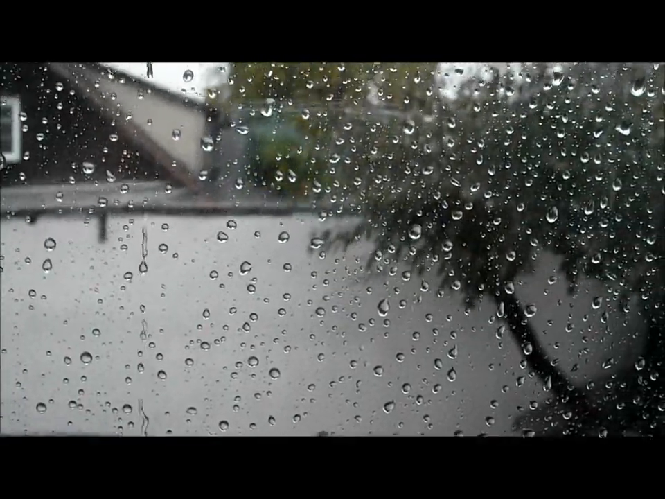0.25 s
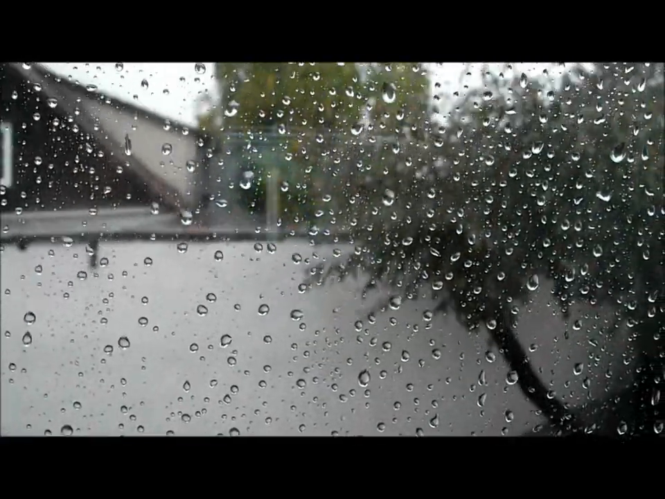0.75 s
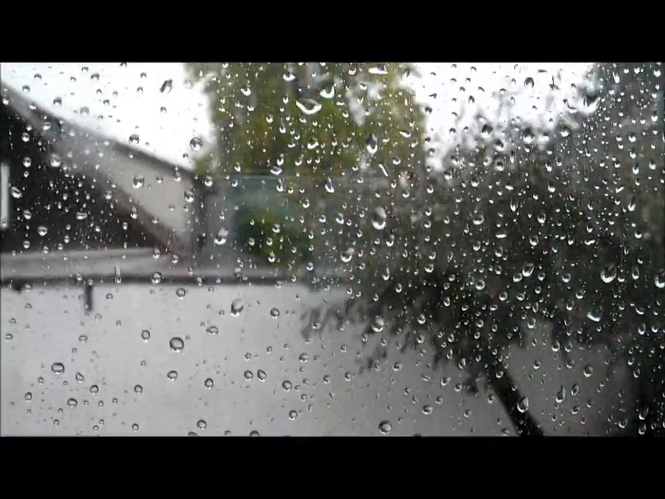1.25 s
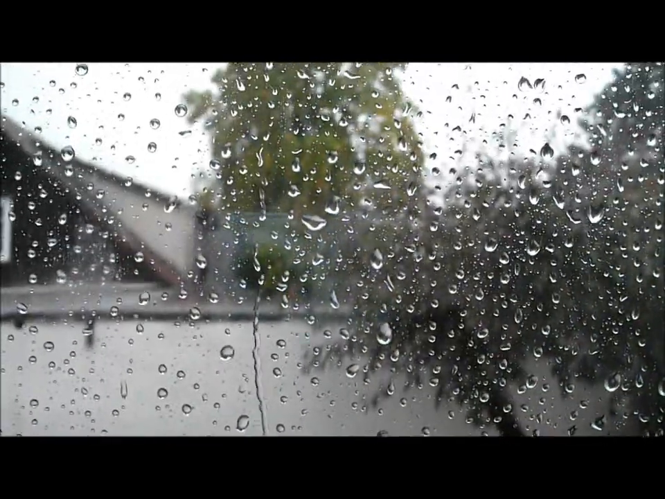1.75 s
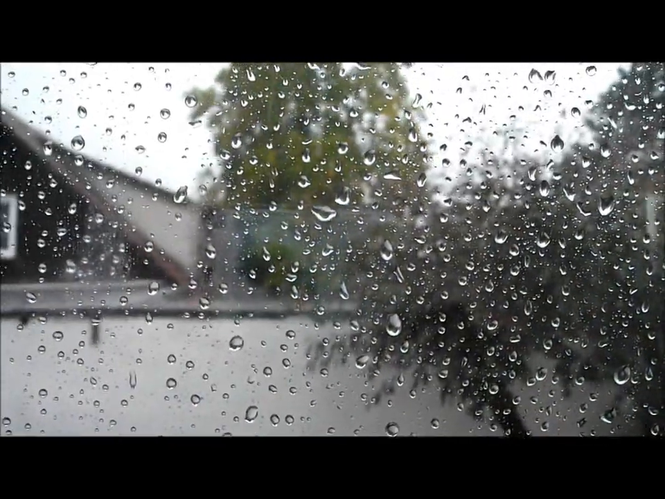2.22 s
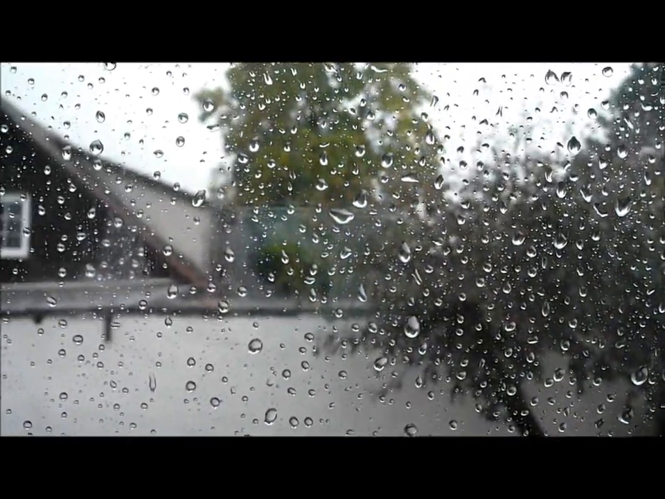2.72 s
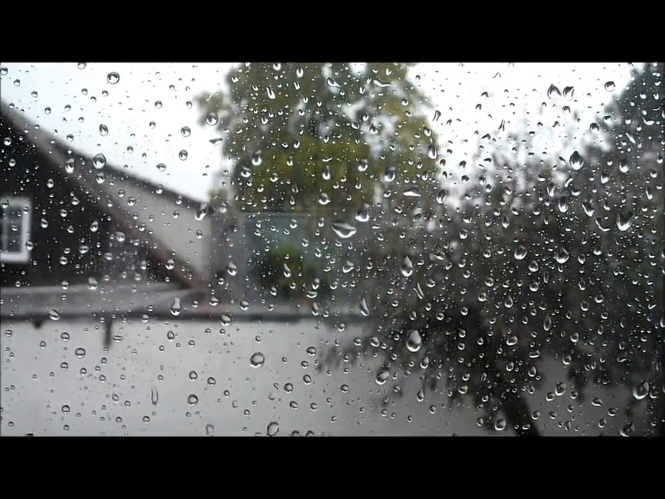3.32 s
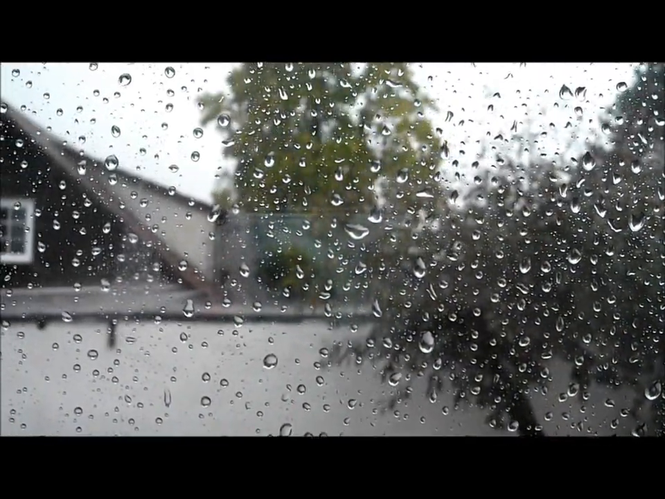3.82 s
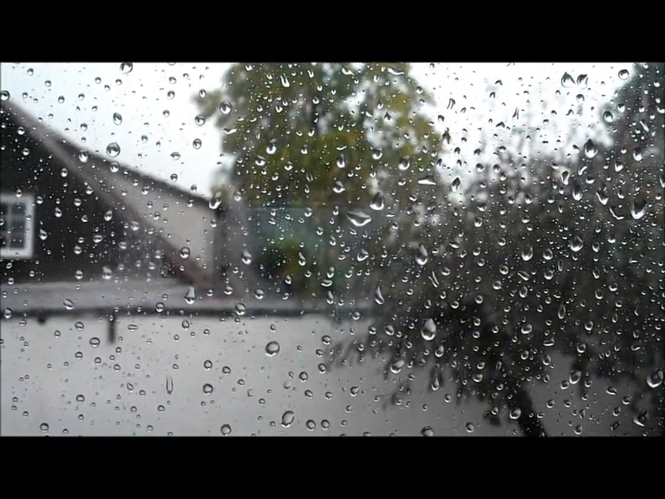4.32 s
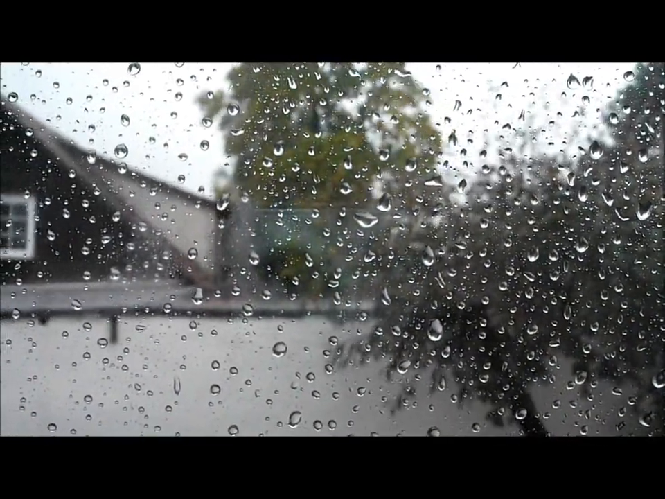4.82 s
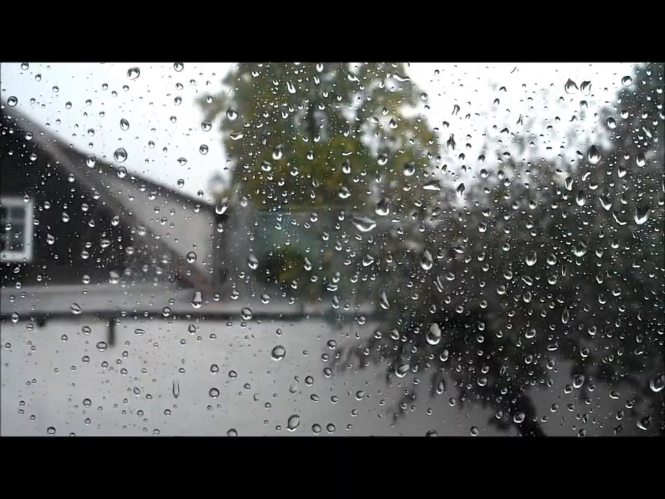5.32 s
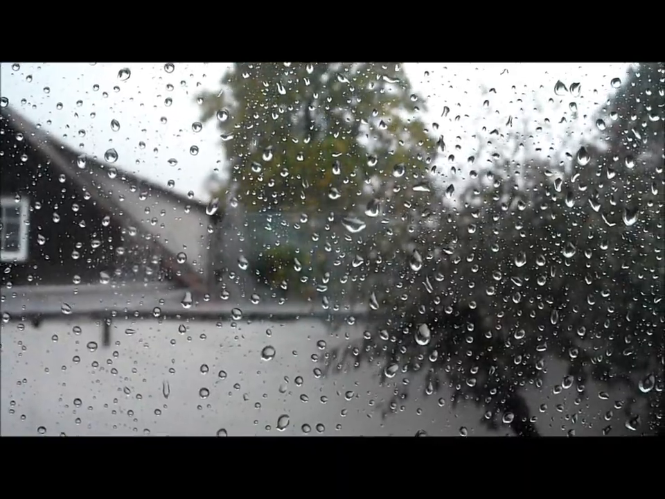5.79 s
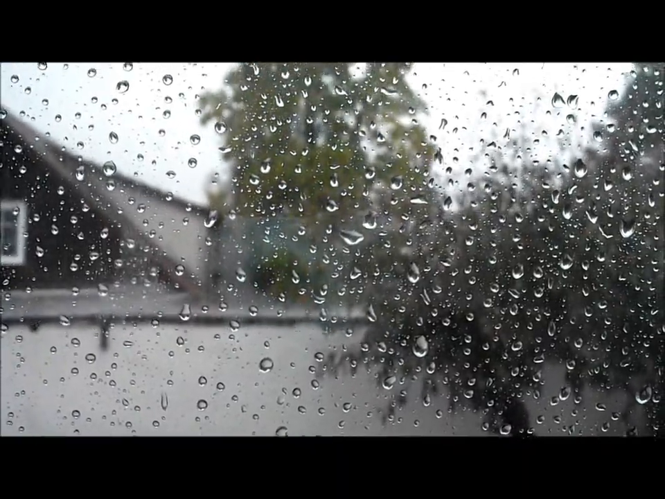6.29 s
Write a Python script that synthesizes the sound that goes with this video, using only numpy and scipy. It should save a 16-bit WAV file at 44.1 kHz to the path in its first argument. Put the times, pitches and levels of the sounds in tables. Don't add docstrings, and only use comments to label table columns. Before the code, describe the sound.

A small camera's microphone, held near wet glass in a quiet room, picks up rain drumming outside. Single drops thump dully, some deeper, some higher near the frame, mixed with short bright spatters. The patter thickens after two seconds, thins slightly near five, then picks up at the end. Low electrical hum and a constant thin, fluttering motor hiss and whine continue throughout.

```python
import sys
import numpy as np
from scipy import signal
from scipy.fft import rfft, irfft, next_fast_len
from scipy.io import wavfile

SR = 44100
rng = np.random.default_rng(int(sys.argv[2]) if len(sys.argv) > 2 else 0)


def natural_amplitude(level_db):
    exponent = np.asarray(level_db, float) / 20
    return 10 ** exponent


def generate_wav(signal):
    frames = np.transpose(np.atleast_2d(signal))
    scaled = np.clip(frames, -1, 1) * 32767
    pcm = np.round(scaled).astype(np.int16)
    wavfile.write(sys.argv[1], SR, pcm)


N = 288863
TIME = np.arange(N) / SR
MIDDLE_HZ = 551.3


def unit(x):
    return x / np.sqrt(np.mean(x ** 2) + 1e-20)


def along(points, hz):
    point_hz, value = np.transpose(points)
    return np.interp(np.log(hz + 1), np.log(point_hz + 1), value, left=-120, right=-120)


def filtered(x, response):
    m = next_fast_len(N + 8192)
    return unit(irfft(rfft(x, m) * response(np.fft.rfftfreq(m, 1 / SR)), m)[:N])


def coloured_noise(spectrum):
    return filtered(rng.standard_normal(N), lambda hz: natural_amplitude(along(spectrum, hz)))


def slow_waver(corner_hz):
    return filtered(rng.standard_normal(N), lambda hz: 1 / (1 + (hz / corner_hz) ** 2))


def resonance(centre_hz, width_hz):
    return filtered(rng.standard_normal(N), lambda hz: 1 / (1 + ((hz - centre_hz) / width_hz * 2) ** 2))


def ringing(modes):
    return sum(natural_amplitude(db) * resonance(hz, width) for hz, width, db in modes)


def place(bursts, seconds):
    at = np.round(seconds * SR).astype(int)[:, None] + np.arange(bursts.shape[1])
    return np.bincount(np.clip(at, 0, N).ravel(), bursts.ravel(), N + 1)[:N]


def room():
    # hz, level_db_per_hz
    rumble_spectrum = [(12, -53), (26, -6.5), (49, -0.5), (91, -6), (150, 1), (165, -13), (210, -2),
                       (360, -120)]
    rumble = natural_amplitude(-51.0) * coloured_noise(rumble_spectrum)
    hum_db = -48.6 + 0.9 * slow_waver(3)
    hum = natural_amplitude(hum_db) * np.sqrt(2) * np.sin(2 * np.pi * 180.11 * TIME)
    modes = ringing([(180, 44, -57.5), (226.0, 16, -64.0), (281, 11, -66.0), (565.6, 21, -66)])
    return hum + rumble + modes


def squeal():
    harmonics_db = [-72, -67.5, -56.5]
    pitch_hz = 3891 + 17 * slow_waver(40)
    phase = 2 * np.pi * np.cumsum(pitch_hz) / SR
    return sum(natural_amplitude(db) * np.sin((k + 1) * phase) for k, db in enumerate(harmonics_db))


def motor():
    turns_hz, depth = 29.007, 1.48
    # share_of_turn, shell_db, top_db, hiss_db
    rotor_turn = [(0, -2, 0, 0), (.24, -2, 1, .5), (.31, -1, 3, 3), (.38, .5, -1, 0), (.5, 3.5, 1.5, 0),
                  (.63, 3.5, 1.5, 0), (.7, -2, -4, -.3), (.97, -2.5, -4, -.5), (1, -2, 0, 0)]
    shell_hz = [11300, 11665, 11950, 12120, 12690]
    # width_hz, level_db
    shell_modes = [(790, -63), (250, -59.5), (590, -59), (149, -74), (120, -89)]
    shell_top_hz = [15230, 15600]
    # width_hz, level_db
    shell_top_modes = [(55, -78), (200, -88)]
    # hz, level_db_per_hz
    hiss_spectrum = [(5000, -21.5), (7000, -16.5), (9000, -16), (10500, -8), (11300, -2), (12100, -14),
                     (12600, -7.5), (14000, -18.5), (15900, -13.5)]
    share, *columns_db = np.transpose(rotor_turn)
    position = TIME * turns_hz % 1
    shell_gain, top_gain, hiss_gain = (natural_amplitude(depth * np.interp(position, share, db)) for db in columns_db)
    shell = shell_gain * (squeal() + ringing(np.c_[shell_hz, shell_modes]))
    top = top_gain * ringing(np.c_[shell_top_hz, shell_top_modes])
    hiss = natural_amplitude(-53.0) * hiss_gain * coloured_noise(hiss_spectrum)
    flutter = 1 + .04 * np.cos(2 * np.pi * 12 * turns_hz * TIME)
    return flutter * (shell + top + hiss)


def whine():
    carrier_hz, step_hz = 9560.23, 36.22
    side_db = -76.5
    swing = natural_amplitude(-60) * (np.cos(2 * np.pi * step_hz * TIME) - .23)
    tone = np.sqrt(2) * swing * np.sin(2 * np.pi * carrier_hz * TIME)
    sides = [(-k, side_db - 1.1 * (k - 3)) for k in range(3, 12, 2)]
    sides += [(k, side_db - .5 * (k - 3)) for k in range(3, 16, 2)]
    for k, db in sides:
        tone += natural_amplitude(db + 3) * np.sin(2 * np.pi * ((carrier_hz + k * step_hz) * TIME + rng.random()))
    return tone


def patter(spectrum, count, spread_db, life_s, share):
    when, size = rng.random((count, 2)).T
    hits = np.bincount((when * N).astype(int), natural_amplitude(-spread_db * np.log(1 - size)), N)
    swell = signal.fftconvolve(hits, np.exp(-TIME[:2000] / life_s))[:N]
    grain = np.sqrt(share) * unit(swell) + np.sqrt(1 - share)
    return filtered(grain * rng.standard_normal(N), lambda hz: natural_amplitude(along(spectrum, hz)))


def pane_wash(rain_db):
    # hz, level_db_per_hz
    pane_spectrum = [(130, -52), (220, -7), (231, 0), (318, -3), (563, -1), (651, -5), (746, -5),
                     (949, -6.5), (1160, -15.5), (1500, -17.5), (1950, -75), (3300, -120)]
    return natural_amplitude(rain_db + 2) * patter(pane_spectrum, count=500, spread_db=0.7, life_s=0.0095, share=0.25)


def spray(rain_db):
    # hz, level_db_per_hz
    spray_spectrum = [(650, -2), (1100, -2.5), (1820, -5.5), (2270, -5.5), (3000, -0.5), (3500, -4.5),
                      (3980, -6), (4820, -9), (7150, -15), (7500, -12.5), (9750, -9.5), (16500, -120)]
    # hz, level_db_per_hz
    glazing_spectrum = [(2800, -30), (2950, -10), (3035, 5), (3120, -6), (3300, -35)]
    spray_db = -57.5 + 1.01 * (rain_db - rain_db.mean())
    fine = patter(spray_spectrum, count=900, spread_db=1.0, life_s=0.0058, share=0.078)
    through = patter(glazing_spectrum, count=120, spread_db=2.5, life_s=0.018, share=0.65)
    return natural_amplitude(spray_db + 1.5) * fine + natural_amplitude(spray_db - 14.5) * through


def splashes():
    # start_s, peak_db, middle_db, high_db
    sill = [(1.935, -37.5, -3, -12), (2.112, -38.5, -15, -25), (2.209, -29, -7, -24),
            (2.273, -35, -20, -20), (2.396, -30.5, -17, -26), (2.605, -26.5, -9, -16),
            (2.778, -40, -18, -15), (2.939, -36, -10, -13), (2.969, -33, -14, -13), (3.074, -34, -10, -15),
            (3.137, -38, -13, -10), (3.174, -28.5, -15, -21), (3.234, -30.5, -7, -13),
            (3.429, -38, -15, -15), (3.715, -32.5, -31, -22), (3.831, -29, -8, -16), (3.973, -33, -8, -22),
            (4.121, -30.5, -16, -19), (4.285, -36, -6, -18), (4.559, -35.5, -11, -20),
            (4.676, -35, -5, -22), (4.85, -40, -9, -19), (4.89, -34, -15, -18), (5.619, -39, -6, -20),
            (5.725, -32, -9, -22), (5.766, -32.5, -6, -19), (5.98, -34.5, -20, -22),
            (6.119, -29.5, -13, -25), (6.39, -32, -8, -24), (3.531, -38, -21, -22)]
    # start_s, peak_db, middle_db, high_db
    bright = [(.973, -40, -2, -14), (2.384, -36, -3, -14), (2.45, -34.5, 1, -15), (2.508, -34, -14, -19),
              (3.261, -35.5, 1, -26), (3.484, -34, -3, -22), (3.51, -34.5, -10, -6), (3.775, -28, -14, -12),
              (4.011, -40, -14, -10), (4.21, -40, -2, -14), (4.225, -32.5, -10, -18),
              (4.308, -35.5, -18, -10), (4.418, -34, 11, -20), (5.382, -33.5, 0, -21),
              (5.453, -38, -2, -16), (5.519, -38, -2, -18), (5.637, -30, 7, -12), (5.915, -36.5, -9, -14),
              (6.39, -32, 1, -16), (6.502, -34, -10, -10), (2.607, -32, -3, -12), (2.202, -38, 0, -20),
              (5.087, -37, -2, -20), (3.43, -41, -12, -13), (4.14, -40, -8, -8), (2.7, -39, -5, -10),
              (1.2, -42, -3, -15)]
    splash_hz = [700, 1450, 2100, 2900, 4400, 8500]
    start_s, peak_db, middle_db, high_db = np.transpose(list(sill) + list(bright))
    low_db = np.repeat([-6.5, -15.5], [len(sill), len(bright)])
    low_db = low_db + 3 * rng.standard_normal(len(start_s))
    t = TIME[:2048]
    tail = natural_amplitude(-60 * t / 0.063)
    burst = natural_amplitude(-6 - 60 * t / 0.019)
    envelope = (tail + burst) * (1 - np.exp(-t / 0.00013))
    puff = rng.standard_normal((len(start_s), len(t))) * envelope
    hz = np.fft.rfftfreq(len(t), 1 / SR)
    colour_db = []
    for low, mid, high in zip(low_db, middle_db, high_db):
        levels_db = [low - 14, low, (low + mid) / 2 - 10, mid - 1, high - 3, high - 22]
        colour_db.append(along(np.c_[splash_hz, levels_db], hz))
    puff = irfft(rfft(puff) * natural_amplitude(colour_db))
    puff /= np.sqrt(np.mean(puff[:, :130] ** 2, axis=1, keepdims=True))
    return place(natural_amplitude(peak_db - 13.5)[:, None] * puff, start_s)


def snaps():
    # start_s, peak_db
    hard_drops = [
        (3.7757, -33),
        (5.0946, -25.5),
    ]
    # pitch_hz, level_db, life_s
    glass_modes = [(2850, -8, .0008), (3600, -7, .00025), (4500, -2.5, .00022), (7400, -12, .0003)]
    start_s, peak_db = np.transpose(hard_drops)
    t = TIME[:256]
    click = 0
    for hz, db, life in glass_modes:
        click = click + natural_amplitude(db) * t / life * np.exp(1 - t / life) * np.sin(2 * np.pi * hz * t)
    return place(natural_amplitude(peak_db - 1.5)[:, None] * click, start_s + 0.00079)


def drops():
    # start_s, peak_db, push_ms, upper_db
    middle = [(.615, -33, 3.1, -16), (.839, -34, 4.4, -16), (.989, -32.5, 4.4, -16), (1.064, -36, 5.6, -12),
              (1.185, -34, 5.1, -9), (1.311, -36.5, 4.8, -29), (1.373, -35, 2.4, -10),
              (1.446, -33.5, 3.3, -26), (1.796, -37, 3.5, -3.5), (1.933, -35, 3.1, -12),
              (2.165, -37, 4.2, -9), (2.208, -31, 4.3, -9), (2.3, -35.5, 2.1, -10), (2.55, -34.5, 3.2, -8),
              (2.975, -37, 6.4, -20), (3.034, -34.5, 4.5, -11), (3.203, -34.5, 4.7, -15),
              (3.276, -36.5, 2.6, -8), (3.49, -31.5, 3, -11), (3.925, -32.5, 3.2, -9),
              (3.969, -35.5, 3.5, -8), (4.149, -32.5, 2.9, -12), (4.403, -35.5, 4.7, -14),
              (4.432, -33.5, 5.7, -8), (4.776, -34, 1.4, -11), (5.024, -34.5, 4.3, -8.5),
              (5.342, -36, 2.8, -17), (5.408, -38, 3.5, -18), (6.021, -37, 3.3, -15),
              (6.164, -33.5, 2.4, -17)]
    # start_s, peak_db, ring_hz, upper_db
    lower = [(.126, -37.5, 460, -9), (.218, -38, 448, -9), (.422, -38.5, 525, -24), (.467, -38, 510, -22),
             (.969, -40.5, 470, -4), (2.067, -39, 526, -5), (2.104, -36, 493, -21), (2.273, -37, 497, -8),
             (2.483, -34, 521, -14), (3.368, -36.5, 496, -10), (3.464, -32, 495, -25),
             (3.532, -28, 497, -9), (3.616, -40, 410, -5), (3.715, -31.5, 455, -17), (3.832, -40, 477, -7),
             (4.864, -35, 503, -16), (4.888, -40, 475, -6), (5.085, -36, 460, -9), (5.314, -39, 460, -5),
             (5.516, -36, 527, -13), (6.316, -36, 441, -5.5), (6.436, -38, 382, -17), (6.492, -36, 502, -3)]
    # start_s, peak_db, ring_hz
    edge = [(2.463, -32.5, 860), (2.598, -35, 836), (3.164, -35.5, 805), (3.236, -31.5, 904),
            (3.429, -37.5, 815), (3.752, -34.5, 820), (3.777, -36.5, 930), (4.226, -39, 984),
            (4.555, -37, 1035), (5.725, -39, 984), (5.764, -33.5, 850), (6.313, -41, 914),
            (6.511, -37, 910), (5.893, -40, 925), (4.07, -43, 900)]
    # start_s, peak_db
    light = [(.024, -42), (.508, -43.5), (1.271, -39.5), (2.505, -43), (2.838, -38.5), (3.074, -36),
             (3.606, -51), (3.668, -44), (4.206, -36), (4.63, -43.5), (5.192, -39), (5.689, -38),
             (5.748, -43.5), (5.873, -42), (6.212, -39), (6.268, -39.5), (1.077, -38.5), (1.203, -36),
             (1.392, -37), (3.293, -40), (.89, -43)]
    rows = [(s, db, MIDDLE_HZ, push_ms, upper) for s, db, push_ms, upper in middle]
    rows += [(s, db, hz, 2.7, upper) for s, db, hz, upper in lower]
    rows += [(s, db, hz, 2.9, -12) for s, db, hz in edge]
    rows += [(s, db, MIDDLE_HZ, 3.5, -11) for s, db in light]
    start_s, peak_db, ring_hz, push_ms, upper_db = np.transpose(rows)
    ring_hz = ring_hz + 7.1 * rng.standard_normal(len(rows))
    neighbour_db = -13 + 2 * rng.standard_normal(len(rows))
    return np.array([start_s, peak_db, ring_hz, push_ms / 1000, upper_db, neighbour_db])


def thuds():
    pane_pair_hz = 485, 565
    start_s, peak_db, hz, push_s, upper_db, neighbour_db = drops()[:, :, None]
    t = TIME[:2048]
    u = t / np.clip(push_s, .001, .015)
    blow = (u * np.exp(1 - u)) ** 2.76
    after = natural_amplitude(-15) * np.exp(-t * (hz / pane_pair_hz[1]) ** 2 / 0.039) * (1 - np.exp(-u * u))
    phase = 2 * np.pi * rng.random((len(start_s), 3, 1))
    ring = (blow + after) * np.sin(2 * np.pi * hz * t + phase[:, 0])
    neighbour_hz = np.where(hz > np.mean(pane_pair_hz), *pane_pair_hz)
    late = t / 0.0063 * np.exp(1 - t / 0.0078)
    neighbour = natural_amplitude(neighbour_db) * late * np.sin(2 * np.pi * neighbour_hz * t + phase[:, 0])
    upper_hz = np.maximum(960, 1.5 * hz)
    upper_swell = np.exp(-t / 0.0058) * (1 - np.exp(-(t / 0.0024) ** 2))
    upper = natural_amplitude(upper_db + 6.0) * upper_swell * np.sin(2 * np.pi * upper_hz * t + phase[:, 1])
    low = natural_amplitude(-12) * blow * np.sin(2 * np.pi * 300 * t + phase[:, 2])
    return place(natural_amplitude(peak_db - 1.5) * (ring + neighbour + upper + low), start_s[:, 0] - .0004)


def rain():
    # start_s, level_db
    rain_strength = [(0.0, -54), (0.9, -55), (1.36, -53), (1.65, -54), (2.1, -54), (2.4, -52.5),
                     (2.84, -51.5), (3.5, -51.5), (4.76, -52), (5.14, -54), (5.8, -54), (6.05, -52),
                     (6.23, -55), (6.45, -50)]
    rain_db = np.interp(TIME, *np.transpose(rain_strength))
    return pane_wash(rain_db) + spray(rain_db) + splashes() + snaps() + thuds()


def scene():
    mono = room() + motor() + whine() + rain()
    return np.array([np.roll(mono, 1), mono])


def top_cut(x):
    return signal.sosfilt(signal.butter(12, 15980, fs=SR, output="sos"), x)


def record(dry):
    top_hz = 15740
    kept = irfft(rfft(dry) * (np.fft.rfftfreq(N, 1 / SR) < top_hz), N)
    return top_cut(kept)


dry = scene()
out = record(dry)
generate_wav(out)
```